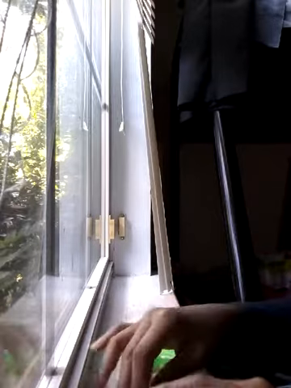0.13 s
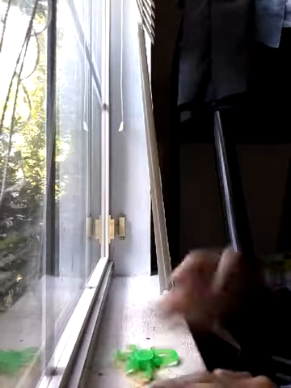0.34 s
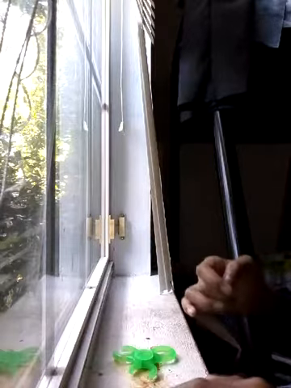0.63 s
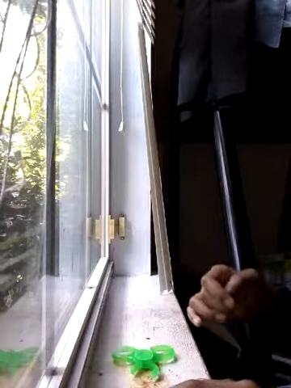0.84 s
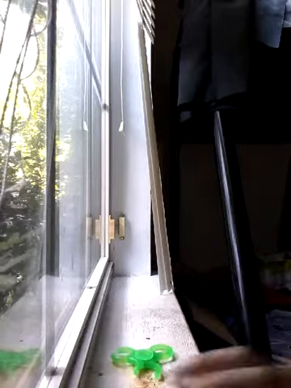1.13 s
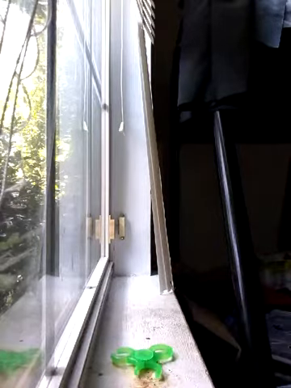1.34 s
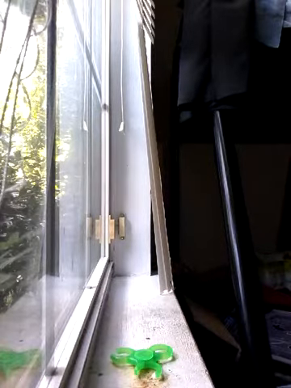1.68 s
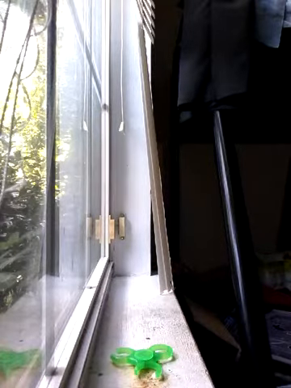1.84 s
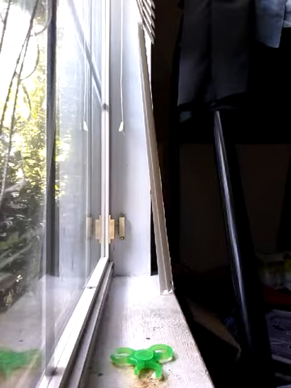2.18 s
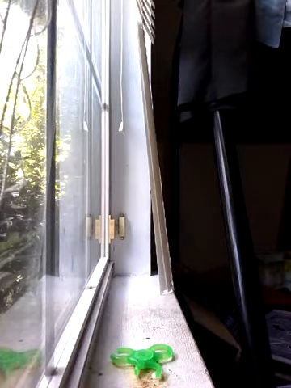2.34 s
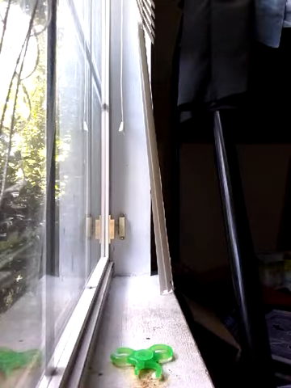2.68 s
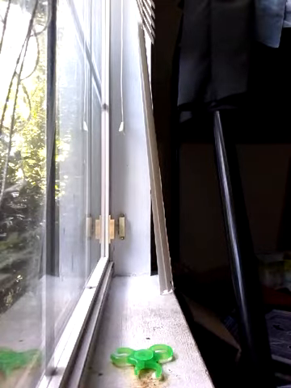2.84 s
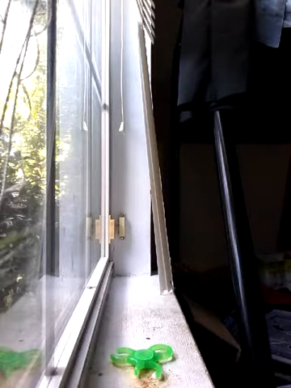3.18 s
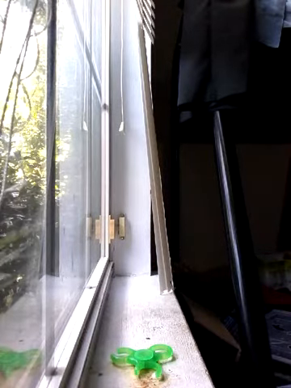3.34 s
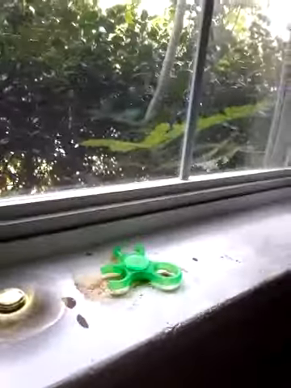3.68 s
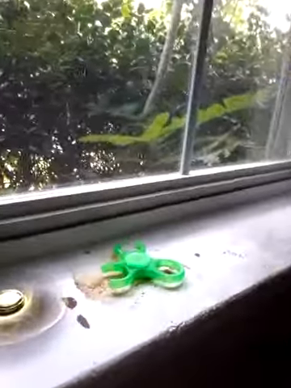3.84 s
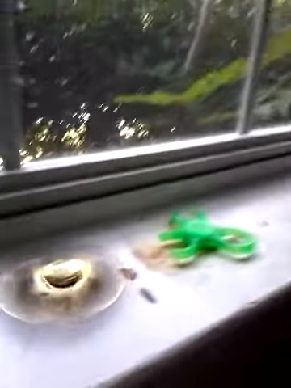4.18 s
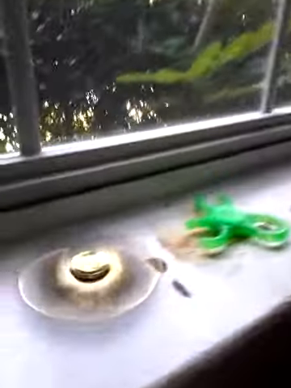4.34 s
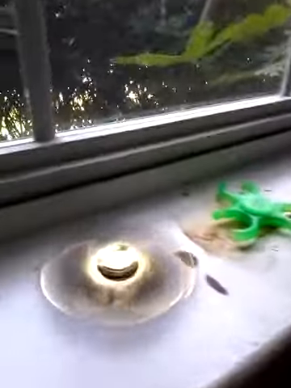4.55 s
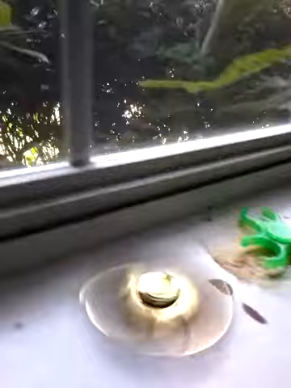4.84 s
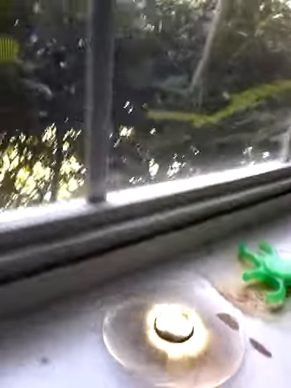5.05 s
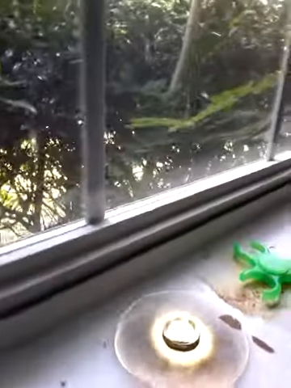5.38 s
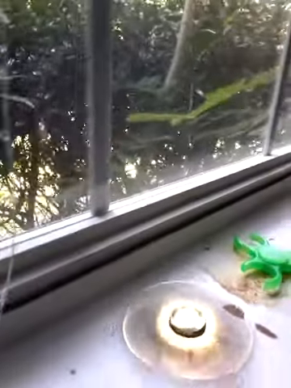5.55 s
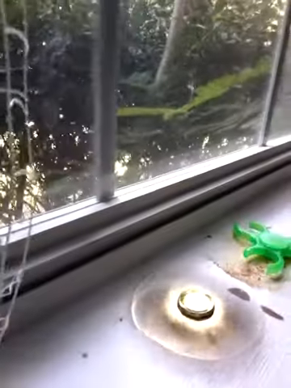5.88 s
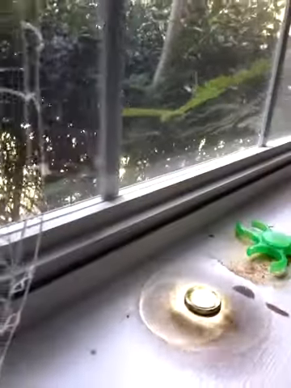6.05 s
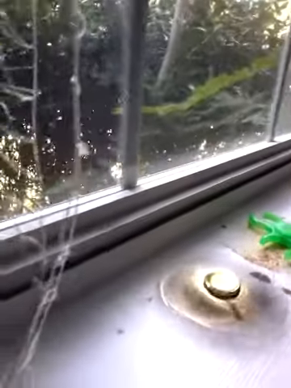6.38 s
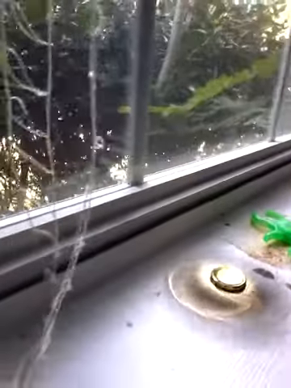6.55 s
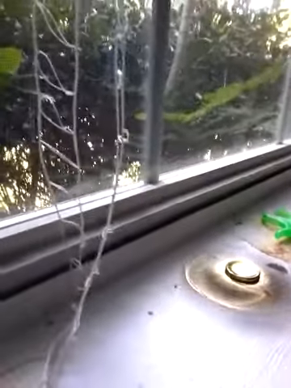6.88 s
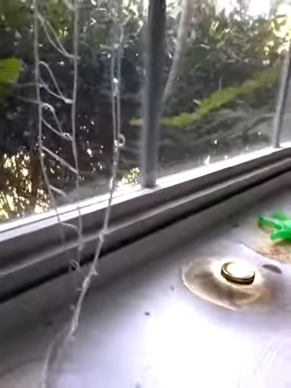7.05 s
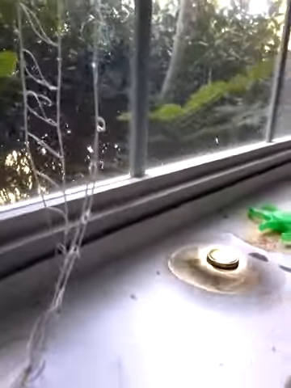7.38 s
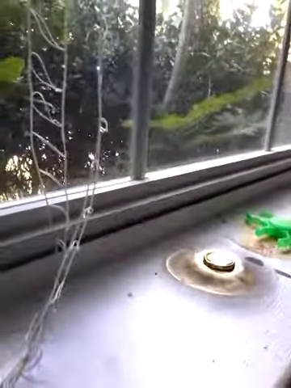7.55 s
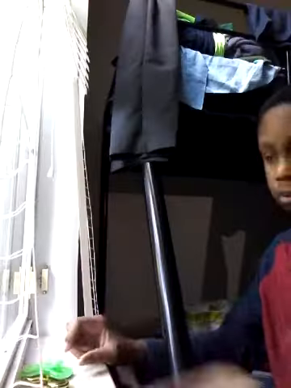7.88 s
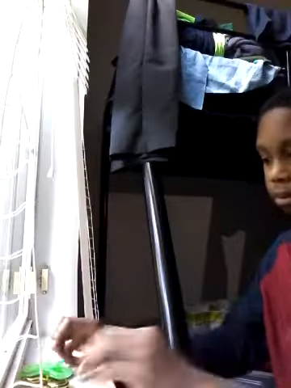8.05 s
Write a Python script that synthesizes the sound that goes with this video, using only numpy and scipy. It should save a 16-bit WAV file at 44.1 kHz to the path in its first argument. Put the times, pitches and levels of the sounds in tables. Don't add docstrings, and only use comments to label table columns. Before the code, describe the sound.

Very close, dry indoor sound: a few finger knocks on wood, then a spinner's steady rattling whir, gritty and hissy, shaking the sill with uneven knocks. Midway it suddenly drops in level, heard from a hand-held distance, with sharp ticks about ten times a second over a swishing whir and a throbbing low hum. A slight scrape, then quiet room tone and faint finger taps.

```python
import sys
import numpy as np
from scipy import signal
from scipy.fft import rfft, irfft
from scipy.io import wavfile
from scipy.ndimage import uniform_filter1d, map_coordinates

SR = 44100
rng = np.random.default_rng(int(sys.argv[2]) if len(sys.argv) > 2 else 0)


def level_to_linear(level):
    exponent = np.asarray(level, float) / 20
    return 10 ** exponent


def pcm_store(signal):
    levels = np.round(np.clip(np.atleast_2d(signal), -1, 1) * 32767)
    wavfile.write(sys.argv[1], SR, levels.astype(np.int16).T)


N = 362485

START, CUT, END = 0.348, 3.613, 7.7825
FIRST_ROOM_DB = -6
# f/Hz, density/dB per Hz
NEAR_SILL = [(88, -52), (150, -26), (237, -15), (281, -3), (333, -5.5), (406, 1), (688, -3), (771, 0.5),
             (1020, -6), (1220, -2), (1500, -5.5), (1730, -3.5), (2210, -6), (3290, -27), (4500, -16.5),
             (5850, -43), (9900, -120)]
# t/s, lower ring peak level/dB, upper ring peak level/dB, lower ring f/Hz
TURN_TICKS = [(3.6387, -35.7, -40, 6900), (3.7328, -38.1, -42, 6770), (3.8397, -36.4, -42.5, 6840),
              (3.9394, -40, -44, 6770), (4.037, -34, -39, 6820), (4.1375, -37.5, -41.2, 6800),
              (4.234, -38, -37.7, 6730), (4.343, -36.5, -39.1, 6850), (4.442, -37, -39, 6770),
              (4.5423, -32.5, -33, 6820), (4.6445, -39.5, -37, 6770), (4.7433, -36, -34, 6830),
              (4.854, -42, -37, 6600), (4.9541, -40.0, -42.7, 6760), (5.0569, -38.5, -40.0, 6800),
              (5.1597, -45, -42, 6640), (5.2609, -36.5, -39.9, 6730), (5.375, -33.5, -36, 6700),
              (5.475, -41, -43, 6700), (5.5807, -37, -38, 6740), (5.687, -41, -44, 6800),
              (5.7867, -39.1, -42.0, 6800), (5.902, -36.5, -38, 6850), (6.0033, -43, -46, 6890),
              (6.112, -42, -38, 6570), (6.22, -37, -36, 6650), (6.3225, -36, -35.5, 6640),
              (6.439, -33.5, -38.8, 6720), (6.541, -34.5, -42.7, 6780), (6.6523, -33.5, -41, 6855),
              (6.7597, -37.8, -40, 6900), (6.8643, -44, -43.1, 6860), (6.984, -46, -40, 6520),
              (7.0891, -43.5, -42.7, 6700), (7.1997, -37, -39, 6680), (7.3093, -43, -45, 6680),
              (7.414, -41.5, -43, 6900), (7.5352, -41, -39, 6760), (7.64, -44, -45, 6780),
              (7.754, -40, -44, 6630)]


def close_spin():
    # t/s, rattle level/dB
    rattle_levels = [(.358, -72), (.372, -53), (.39, -44), (.55, -43), (.94, -38.5), (1.29, -38),
                     (1.325, -35), (1.5, -34.5), (1.68, -35.5), (1.85, -37), (2.7, -35.5), (3.15, -38.5),
                     (3.6, -37.5)]
    # f/Hz, width/Hz, level/dB
    sill_modes = [(279, 22, 0), (386, 400, -21), (1210, 34, 3.5), (1410, 49, 1.5), (1687, 91, 0.5),
                  (2030, 290, -4), (2350, 91, 1.5), (2650, 65, 0)]
    # f/Hz, density/dB per Hz
    open_hiss = [(1650, -18.5), (2800, 1.5), (3330, -6.5), (3610, -4.5), (3990, -6.5), (6290, -5.5),
                 (6910, -2.5), (8160, -8), (9290, -13), (9920, -24), (10900, -19), (12100, -31),
                 (15100, -18.5), (15800, -24)]
    # f/Hz, density/dB per Hz
    shaded_hiss = [(1530, -23), (2600, -7), (2850, -7.5), (3600, 1), (4310, -8.5), (5120, -1.5),
                   (7990, -5.5), (9950, -19.5), (11100, -18), (11800, -29), (15800, -19)]
    # t/s, peak level/dB, loudest mode f/Hz
    cap_knocks = [(0.8369, -18, 1140), (0.9425, -21, 2000), (0.9839, -15.5, 1240), (1.0573, -22, 275),
                  (1.2035, -24, 1680), (1.2876, -17.5, 1210), (1.3007, -21, 2380), (1.3221, -17, 387),
                  (1.3443, -23, 400), (1.3538, -15.5, 1270), (1.385, -21, 1150), (1.4254, -18.5, 1280),
                  (1.4431, -15.5, 1790), (1.4538, -19, 1350), (1.4921, -18, 1230), (1.5053, -21, 1160),
                  (1.5473, -23, 1280), (1.6088, -19, 1270), (1.6212, -22, 1340), (1.6452, -29, 1350),
                  (1.6703, -21.5, 474), (1.7169, -19, 1700), (1.735, -15, 1200), (1.7668, -21, 1180),
                  (1.8117, -16, 1210), (1.8339, -23, 1740), (1.8452, -15.5, 390), (1.9675, -19.5, 374),
                  (1.9894, -17.5, 1360), (2.0175, -22, 413), (2.0337, -17.5, 280), (2.1003, -20.5, 1210),
                  (2.1616, -18, 1210), (2.1787, -19.5, 370), (2.2355, -25, 410), (2.2586, -22, 1720),
                  (2.3124, -20.5, 1390), (2.3432, -20, 1160), (2.4183, -27, 1180), (2.4923, -21, 1220),
                  (2.5202, -22, 1230), (2.5405, -18, 2050), (2.5661, -19.5, 1690), (2.6348, -23, 1260),
                  (2.6588, -19.5, 1760), (2.6869, -22, 1790), (2.7322, -17, 2090), (2.7797, -23.5, 363),
                  (2.8129, -20.5, 447), (2.85, -26, 720), (2.868, -22.5, 1920), (2.9763, -27, 1390),
                  (3.0703, -24, 1670), (3.0996, -24, 1410), (3.2172, -19, 1790), (3.2981, -23, 550),
                  (3.3283, -18, 1390), (3.5271, -23, 444)]
    # t/s, peak level/dB
    light_blows = [(0.4382, -24), (0.711, -33), (0.761, -27), (0.8206, -20), (0.91, -26), (0.9682, -25),
                   (1.192, -20.5), (1.2335, -23), (1.277, -23), (1.9583, -19), (2.3237, -24), (3.2122, -26),
                   (3.241, -25), (3.392, -20), (3.4991, -20)]

    contact = balls(900, 2.63, 0.59, 1.37, 0.0087)
    thinned = contact * lulls(cap_knocks, 0.32, 0.0074)
    sill = colour(thinned, NEAR_SILL, sill_modes, ring_db=2.0)

    fine_contact = balls(2500, 1.8, 0.67, 2.2, 0.0065)
    source = 0.35 * contact + fine_contact + 0.3 * pings(700, 8.9, 110)
    hiss = blend(source, [shaded_hiss, open_hiss], (0.92, 1.18))

    rattle_db = curve(rattle_levels)
    over_db = rattle_db + 38
    hiss_db = -44 + np.minimum(1.53 * over_db, 0.27 * over_db)
    spin = level_to_linear(rattle_db) * sill + level_to_linear(hiss_db) * hiss

    blows = [(s, db, 1500) for s, db in light_blows]
    spin = spin + knocks(blows, 0.0, body(NEAR_SILL, sill_modes), 0.0043)
    knock_body = body(NEAR_SILL, sill_modes, ring_db=-9.0)
    spin = spin + knocks(cap_knocks, -1.7, knock_body, 0.0033, ring=0.56, sharpness=6.6, heavy_db=-16.0)
    return between(START, CUT) * spin


def far_spin():
    # t/s, sill rumble level/dB, cage whirr level/dB, bearing hiss level/dB
    spin_levels = [(3.62, -55, -55, -53), (3.8, -55, -54.5, -53.5), (5.0, -50, -52.5, -53.5),
                   (5.55, -50.5, -51.5, -55), (5.94, -50, -50.5, -54), (6.61, -51, -50, -54.5),
                   (7.61, -52, -52.5, -58.5), (7.78, -52, -49.5, -61)]
    # f/Hz, density/dB per Hz
    far_sill = [(82, -29.5), (140, -24), (155, -27), (193, -8.5), (243, -16.5), (296, 1), (335, -5),
                (391, -2.5), (456, -3.5), (576, -1), (709, -12), (793, -10.5), (1100, -20), (1430, -28),
                (2420, -120)]
    # f/Hz, width/Hz, level/dB
    far_modes = [(293, 67, 1), (406, 32, 1), (496, 34, 0.5), (609, 34, 1.5)]
    # t/s, peak level/dB, loudest mode f/Hz
    far_knocks = [(3.792, -37, 412), (3.885, -34, 297), (4.089, -37, 299), (4.138, -40, 304),
                  (4.255, -35.5, 286), (4.294, -36, 401), (4.392, -31, 376), (4.442, -43, 393),
                  (4.562, -32, 500), (4.591, -32, 290), (4.725, -38, 540), (4.743, -36, 293),
                  (4.772, -33.5, 420), (4.805, -32, 452), (4.899, -33, 394.5), (4.963, -39, 487),
                  (5.003, -37, 382), (5.082, -29, 564), (5.106, -30, 554), (5.162, -42, 306),
                  (5.186, -38, 294), (5.266, -30.5, 415), (5.296, -30.5, 304), (5.324, -38, 404),
                  (5.42, -37, 306), (5.525, -37, 383), (5.635, -30, 401), (5.71, -36.5, 600),
                  (5.816, -27.5, 401), (5.852, -33.5, 398), (5.885, -36, 565), (5.949, -27.5, 315),
                  (6.007, -34, 301), (6.056, -38, 374), (6.167, -30, 392), (6.221, -40, 313),
                  (6.256, -37, 404.4), (6.303, -33.5, 312), (6.359, -36, 482), (6.387, -29.5, 584),
                  (6.485, -31, 624), (6.55, -37, 391), (6.581, -34, 585), (6.635, -32.5, 500),
                  (6.676, -35.5, 559), (6.707, -29.5, 380), (6.758, -37, 573), (6.839, -32.5, 520),
                  (6.885, -36.5, 507), (6.929, -28.5, 612), (6.962, -37, 497), (7.029, -33.5, 350),
                  (7.125, -29.5, 385), (7.172, -38, 574), (7.224, -37, 551), (7.254, -31, 493),
                  (7.437, -41, 514), (7.467, -35, 560), (7.48, -38, 313), (7.705, -37, 404)]
    # f/Hz, density/dB per Hz
    whirr_spectra = [
        [(380, -27), (650, -6), (809, -12), (1010, -16), (1120, 1.5), (1320, -9.5), (1490, 0), (1780, -0.5),
         (2160, -6), (2400, -9), (2700, -5.5), (4200, -19.5), (5460, -46), (9240, -120)],
        [(380, -40), (650, -5.5), (815, -5), (1270, -9), (1660, 1.5), (2130, -6), (2280, -13), (2930, -3.5),
         (3170, -18), (4200, -19), (5460, -17.5), (9240, -120)],
        [(380, -29), (650, 0), (1050, -5), (1450, -1), (1720, -5), (2110, -13), (2490, -3), (2860, -0.5),
         (3590, -20), (4200, -54), (5460, -85), (9240, -120)],
    ]
    # t/s, position (0-2)
    whirr_path = [(4.7, 0), (5.1, 0.87), (6.15, 1.27), (6.45, 1.78), (7.5, 2.32)]
    # f/Hz, density/dB per Hz
    hiss_spectra = [
        [(1940, -24), (3300, -12.5), (4150, -12.5), (4670, -0.5), (5390, -14), (6300, -9), (6640, -4),
         (7770, -2), (10400, -21.5), (12900, -23), (15800, -10)],
        [(1940, -49), (3300, -14), (4550, -9), (5250, -9), (6950, -3), (7980, -3.5), (10800, -19), (12900, -21),
         (14200, -12), (15800, -11)],
        [(1940, -17), (3300, -5), (3960, -10.5), (5350, -7.5), (6020, -3), (7050, -8), (7620, -1),
         (9580, -19.5), (12600, -17), (15800, -23)],
    ]
    hiss_moments = [4.54, 5.1, 7.64]
    # f/Hz, width/Hz, depth/dB, swells a turn, place in the turn (0-1)
    hiss_swells = [(4700, 600, 3.5, 2, .25), (6750, 400, 6.5, 1, .15), (7600, 900, 4, 1, .74),
                   (6000, 500, 4.5, 2, .2)]
    # t/s, f/Hz, level/dB
    race_song = [(3.62, 7700, -58), (4.6, 7700, -62), (5.3, 7360, -66), (5.7, 7240, -58), (6.1, 7450, -58),
                 (6.5, 7300, -61), (6.85, 7430, -56), (7.3, 7600, -72), (7.78, 7600, -65)]
    # t/s, f/Hz, level/dB
    low_song = [(5.6, 4700, -83), (5.9, 4800, -68), (7.3, 4600, -75)]

    rumble = balls(400, 3.5, 0.27, 1.4, 0.025)
    late = [(s + 0.001276, db, hz) for s, db, hz in far_knocks]
    sill = colour(rumble * lulls(late, 0.21, 0.008), far_sill, far_modes, ring_db=7.5)

    cage = 0.66 * rumble + balls(1200, 1.6, 0.9, 2.47, 0.0095)
    whirr = blend(cage, whirr_spectra, *np.transpose(whirr_path))

    bearing = balls(2500, 2.0, 0.92, 1.0, 0.012) + 0.2 * pings(330, 6.4, 170)
    hiss = evened(mirrored(blend(bearing, hiss_spectra, hiss_moments)))
    turns = np.interp(np.arange(N) / SR, np.array(TURN_TICKS)[:, 0], np.arange(len(TURN_TICKS)))
    for hz, width, db, times, place in hiss_swells:
        swell = level_to_linear(db * np.cos(2 * np.pi * times * (turns - place)))
        hiss = hiss + (swell - 1) * resonate(hiss, hz, width)

    spin = sum(level_to_linear(curve(spin_levels, k + 1)) * part for k, part in enumerate((sill, whirr, hiss)))

    hz = curve(race_song)
    sing = resonate(balls(3000, 2.2, 0.95, 4.3, 0.0081), hz, 420)
    sing = evened(resonate(sing, hz, 700))
    spin = spin + level_to_linear(curve(race_song, 2) + 4.0 * np.cos(2 * np.pi * (turns - 0.7))) * sing

    low = resonate(rng.standard_normal(N), curve(low_song), 300)
    low = evened(resonate(low, 4480, 600))
    spin = spin + level_to_linear(curve(low_song, 2) + 2.8 * np.cos(4 * np.pi * (turns - 0.25))) * low

    knock_body = body(far_sill, far_modes, ring_db=-3.5)
    spin = spin + knocks(late, -1.8, knock_body, 0.0049, ring=0.65, sharpness=7.1)
    spin = spin + knocks(late, -11.5, body(whirr_spectra[1]), 0.0066)
    return between(CUT, END) * spin


def ticks():
    # width/Hz, level/dB
    tick_modes = [(204, 1), (310, -1), (700, -23.5)]
    out, t = np.zeros(N + 3000), np.arange(3000) / SR
    luck = rng.random((len(TURN_TICKS), 4))
    noises = rng.standard_normal((len(TURN_TICKS), 3000))
    for (s, db, upper_db, low_hz), noise, u in zip(TURN_TICKS, noises, luck):
        fade = np.exp(-t / 0.0018) + 0.17 * np.exp(-t / 0.0086)
        chatter = (noise + 6 * (t == 0)) * fade
        pitches = [low_hz, 7600 + 500 * u[0], 11600]
        levels = [db, upper_db, upper_db + 10 * u[1]]
        for (width, ring_db), hz, level in zip(tick_modes, pitches, levels):
            ring = resonate(resonate(chatter, hz, width), hz, 4.0 * width)
            out[round(s * SR):][:3000] += level_to_linear(level + ring_db) * ring / abs(ring).max()

    snaps = [(s + 0.0083 * u[2] ** 2, upper_db - 7 - 11 * u[3], 14400)
             for (s, db, upper_db, hz), u in zip(TURN_TICKS, luck)]
    snap = resonate(strikes(snaps, 0.0094, 1.2), 15000, 2600)
    snap = resonate(snap, 15000, 2600)
    return (out[:N] + snap) * between(0, END)


def hum():
    # t/s, f/Hz, level/dB
    lower_mode = [(3.62, 104.5, -68), (4.0, 101, -61), (4.6, 100.6, -56.5), (4.92, 102.4, -50),
                  (5.05, 107.6, -70.5), (5.62, 107.8, -55.5), (5.76, 108.4, -58.5), (5.9, 107.3, -54.5),
                  (6.45, 105.7, -58), (6.68, 105.9, -43.5), (7.0, 105.6, -50.5), (7.14, 104.6, -41),
                  (7.35, 107.7, -39.5), (7.5, 108, -50), (7.78, 108.8, -72)]
    # t/s, level/dB
    upper_mode = [(5.6, -82), (5.9, -58), (6.45, -66), (6.7, -61), (7.0, -52), (7.35, -52), (7.5, -51),
                  (7.78, -51)]
    # t/s, beats
    beat_count = [(3.62, -20), (5.89, 0), (7.13, 11), (7.35, 13.3), (7.55, 16), (7.78, 19.3)]
    # rows of t/s, level/dB; then its f/Hz
    third_mode = [(6.3, -80), (6.95, -64), (7.78, -63)], 183
    strand_levels, strand_hz = third_mode

    hz = curve(lower_mode)
    cycles = np.cumsum(hz) / SR
    shake = rng.standard_normal(N)
    fuzz = evened(resonate(resonate(shake, hz, 30), hz, 25))
    strand = evened(resonate(resonate(shake, strand_hz, 10), strand_hz, 10))
    strand = level_to_linear(curve(strand_levels)) * strand
    tone = np.sqrt(2) * np.sin(2 * np.pi * cycles)
    lower = level_to_linear(curve(lower_mode, 2)) * evened(tone + 0.22 * fuzz)
    upper = level_to_linear(curve(upper_mode)) * np.sqrt(2) * np.sin(2 * np.pi * (cycles + curve(beat_count)))
    return between(CUT, END) * (lower + upper + strand)


def hands():
    # rows of t/s, level/dB; then rows of f/Hz, density/dB per Hz
    settling = [(0.0, -43), (0.012, -40), (0.13, -70)], [(88, -49), (150, -11), (405, 2), (685, -9.5),
                (5400, -31), (6690, -8), (7510, -29), (15800, -38)]
    # rows of f/Hz, density/dB per Hz; then level/dB; then start t/s
    scrape = [(1760, -43), (3000, -16), (3820, -13), (4680, -38), (6440, 1), (7390, -16), (10800, -19),
              (15800, -20)], -48, 7.755
    # t/s, peak level/dB, loudest mode f/Hz
    finger_taps = [(.0374, -43, 1500), (.123, -58, 1300), (.164, -50, 685), (.171, -53, 1700),
                   (.178, -54, 800), (.326, -57, 1800)]
    # t/s, peak level/dB, f/Hz, t60/s
    thumps = [(.001, -31, 460, 0.019), (.0135, -21, 550, 0.03), (.0145, -27.5, 1660, 0.017),
              (.023, -32, 400, 0.034), (.106, -52, 520, 0.033), (2.612, -24.5, 328, 0.046),
              (.389, -26.5, 374, 0.028), (8.075, -55, 553, 0.038), (8.1, -58, 339, .04),
              (8.114, -59, 500, 0.024), (.0155, -43, 2300, 0.012)]
    # t/s, peak level/dB, f/Hz
    clicks = [(0.0064, -38, 6720), (0.0149, -35.5, 6360), (0.0374, -37.5, 6420), (0.2678, -68, 6800),
              (0.3257, -54, 6800), (0.3835, -41, 6800), (0.3974, -39, 6800), (3.5828, -35, 6750),
              (3.9694, -45, 7500), (4.472, -37, 5470), (4.4784, -46, 4960), (4.4844, -42, 8000),
              (5.034, -39, 7400), (7.1267, -44, 7630), (7.1268, -42, 6580)]
    # t/s, peak level/dB, f/Hz, t60/s
    bump = [
        (2.614, -35, 90, 0.12),
    ]

    settle_levels, settle_spectrum = settling
    settle = level_to_linear(curve(settle_levels) - 6.5) * colour(rng.standard_normal(N), settle_spectrum)
    settle = between(0, 0.17) * settle
    scrape_spectrum, scrape_db, scrape_start = scrape
    grip = level_to_linear(scrape_db) * colour(balls(3000, 3.4, 0.97, 2.4, 0.0055), scrape_spectrum)
    grip = between(scrape_start, END) * grip
    tapping = knocks(finger_taps, -0.1, body(NEAR_SILL), 0.0037, ring=0.43, sharpness=2.8)
    impacts = strikes(thumps, 0.02, 0.32) + strikes(clicks, 0.02, 0.46) + strikes(bump, 0.1, 0.81)
    return settle + grip + tapping + impacts


def room():
    # f/Hz, density/dB per Hz
    room_tone = [(24, -42), (40, -13.5), (75, -7), (111, -0.5), (151, -7.5), (430, -17.5), (512, -19.5),
                 (4990, -33), (6560, -32), (8640, -45), (15800, -31)]
    # rows of t/s, level/dB; then rows of f/Hz, density/dB per Hz
    low_shake = [ [(0.36, -71), (1.35, -63), (5.67, -60), (5.86, -57.5), (7.78, -54.5)], ][0], [(24, -43),
                 (40, -17), (59, -5), (108, 1), (167, -9.5), (220, -6), (290, -23.5), (480, -120)]

    spinning = between(START, END)
    shake_levels, shake_spectrum = low_shake
    shake = spinning * level_to_linear(curve(shake_levels)) * colour(rng.standard_normal(N), shake_spectrum)

    whine_hz = 15600
    fizz = resonate(resonate(rng.standard_normal(N), whine_hz, 450), whine_hz, 450)
    tone = np.sqrt(2) * np.sin(2 * np.pi * whine_hz * np.arange(N) / SR)
    whine_db = -72 - 14 * (1 - spinning) - 4.5 * between(CUT, END)
    whine = level_to_linear(whine_db) * (tone + level_to_linear(-4.0) * evened(fizz))

    air_db = -66 + FIRST_ROOM_DB * between(0, START)
    return level_to_linear(air_db) * colour(rng.standard_normal(N), room_tone) + shake + whine


def balls(per_s, spread_db, smooth, gust_db, gust_s):
    sign = rng.choice([-1., 1.], N)
    size = level_to_linear(spread_db * np.minimum(rng.exponential(1, N), 3.6)) * sign
    hits = evened(size * (rng.random(N) < per_s / SR))
    span = max(round(gust_s * SR), 2)
    gust = uniform_filter1d(rng.standard_normal(N), span)
    gust = evened(uniform_filter1d(gust, span))
    return (hits + smooth * rng.standard_normal(N)) * level_to_linear(gust_db * 2 * np.tanh(gust / 2))


def pings(per_s, spread_db, width):
    race_modes = [5010, 5230, 6320, 6840, 7160, 7700, 8100, 8410]
    size = level_to_linear(spread_db * np.minimum(rng.exponential(1, N), 3.6))
    size = size * (rng.random(N) < per_s / SR)
    mode, t = rng.integers(0, len(race_modes), N), np.arange(800) / SR
    total = np.zeros(N)
    for k, hz in enumerate(race_modes):
        ring = np.sin(2 * np.pi * hz * t) * t * np.exp(-np.pi * width * t)
        total += signal.oaconvolve(size * (mode == k), ring)[:N]
    return evened(total)


def knocks(rows, trim_db, taps, bounce_s, ring=0., sharpness=8., heavy_db=0.):
    out, t = np.zeros(N + 6000), np.arange(-300, 600) / SR
    for (s, db, hz), draw in zip(rows, rng.standard_normal((len(rows), 900))):
        before = np.clip(1 + (db - heavy_db) / 4, 0, 1)
        bounces = draw * (abs(draw) > 2.5) * np.where(t < 0, before, 1)
        blows = (bounces + 4 * (t == 0)) * np.exp(-abs(t) / bounce_s)
        knock = evened(signal.fftconvolve(blows, taps))
        knock = knock + ring * evened(resonate(knock, hz, hz / sharpness))
        out[round(s * SR):][:len(knock)] += level_to_linear(db + trim_db) * knock / abs(knock).max()
    return out[300:][:N]


def lulls(rows, depth, lift_s):
    marks = np.zeros(N)
    marks[[round(row[0] * SR) for row in rows]] = 1
    lift = np.hanning(2 * round(lift_s * SR) + 1)
    lifted = signal.oaconvolve(marks, lift)[round(1.5 * lift_s * SR):][:N]
    return 1 - depth * np.minimum(lifted, 1)


def strikes(rows, t60, rough):
    out, t = np.zeros(N + 8000), np.arange(8000) / SR
    for (s, db, hz, *own), noise in zip(rows, rng.standard_normal((len(rows), 8000))):
        bounce = resonate(resonate(noise, hz, 0.45 * hz), hz, 1.8 * hz)
        ring = np.sin(2 * np.pi * hz * t) + rough * evened(bounce)
        decay = level_to_linear(db - 60 * t / (own or [t60])[0])
        out[round(s * SR):][:8000] += decay * ring * (1 - np.exp(-t * hz / 0.71))
    return out[:N]


def mirrored(x):
    # t/s, delay/ms, strength (0-1)
    pane = [(4.4, 1.065, .15), (5.0, .975, .35), (5.6, .835, .45), (6.2, .78, .45), (6.45, .705, .45),
            (7.0, .655, .3), (7.78, .655, .15)]
    place = np.arange(N) - curve(pane) * SR / 1000
    band = signal.butter(2, [6600, 11000], "band", fs=SR, output="sos")
    treble = signal.sosfiltfilt(band, x)
    return x + curve(pane, 2) * map_coordinates(treble, [place], order=3)


def blend(x, spectra, times, places=None):
    stops = np.arange(len(times)) if places is None else np.clip(places, 0, 2)
    place = np.interp(np.arange(N) / SR, times, stops)
    return evened(sum(np.maximum(1 - abs(place - k), 0) * colour(x, s) for k, s in enumerate(spectra)))


def colour(x, *spectrum, **how):
    return evened(signal.oaconvolve(x, body(*spectrum, **how))[:N])


def body(points, rings=(), ring_db=0):
    hz = abs(np.fft.fftfreq(8192, 1 / SR))
    lift = sum(level_to_linear(db + ring_db) / np.hypot(1, 2 * (hz - f) / w) for f, w, db in rings)
    log_gain = np.log(np.maximum(level_to_linear(read(points, hz)) * (1 + lift), 1e-5))
    taps = np.fft.ifft(np.exp(np.conj(signal.hilbert(log_gain)))).real[:4096]
    return taps / np.linalg.norm(taps)


def resonate(x, hz, width):
    turn = np.exp(2j * np.pi * np.cumsum(hz * np.ones(len(x))) / SR)
    r = np.exp(-np.pi * width / SR)
    return 2 * (turn * signal.lfilter([1 - r], [1, -r], x / turn)).real


def evened(x):
    return x / np.sqrt(np.mean(x ** 2) + 1e-20)


def read(points, hz):
    f, value = np.transpose(points)
    return np.interp(np.log(hz + 1), np.log(f + 1), value)


def curve(rows, column=1):
    table = np.array(rows)
    return np.interp(np.arange(N) / SR, table[:, 0], table[:, column])


def between(start, stop):
    return (np.arange(N) >= start * SR) & (np.arange(N) < stop * SR)


def scene():
    mono = close_spin() + far_spin() + ticks() + hum() + hands() + room()
    return np.tile(mono, (2, 1))


def top_cut(x):
    return signal.sosfilt(signal.butter(12, 16620, fs=SR, output="sos"), x)


def record(dry):
    # f/Hz, left minus right level/dB
    channel_lean = [(60, -1), (500, -1.2), (1170, -1.5), (1790, -2.0), (2740, -3), (4190, -8), (6410, -7),
                    (9810, 5), (15000, -2.5)]
    limit, edge_hz = 0.17, 15900
    hz = np.fft.rfftfreq(N, 1 / SR)
    lean = level_to_linear(read(channel_lean, hz))
    sides = np.array([2 * lean / (1 + lean), 2 / (1 + lean)])
    hiss_db = -78.5 + FIRST_ROOM_DB * between(0, START)
    hiss = level_to_linear(hiss_db) * rng.standard_normal((2, N))
    pair = rfft(limit * np.tanh(dry / limit)) * sides + rfft(hiss)
    mix = irfft(pair / (1 + (hz / edge_hz) ** 200), N) - 0.0006
    return top_cut(mix)


dry = scene()
out = record(dry)
pcm_store(out)
```